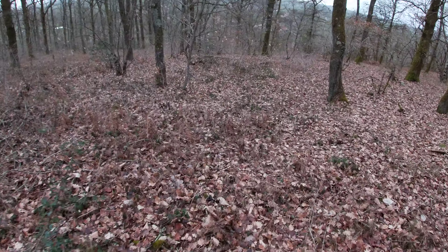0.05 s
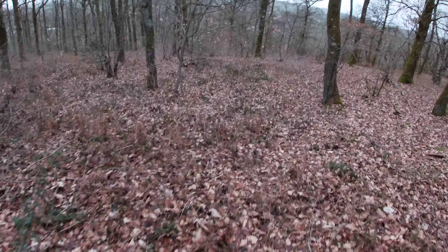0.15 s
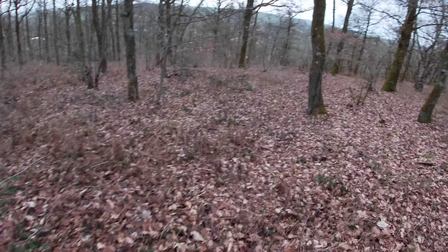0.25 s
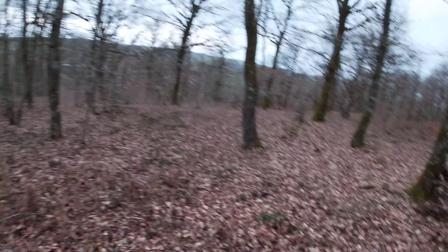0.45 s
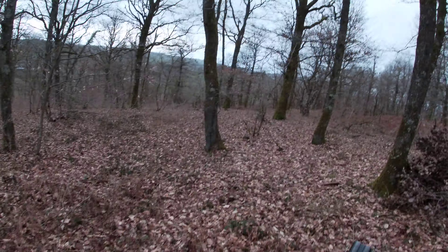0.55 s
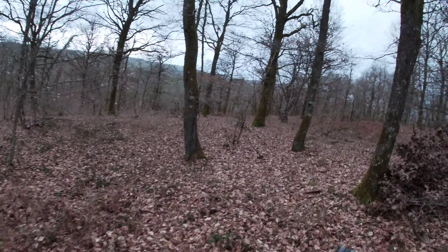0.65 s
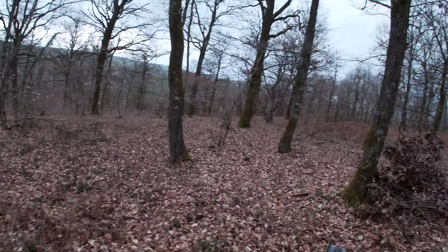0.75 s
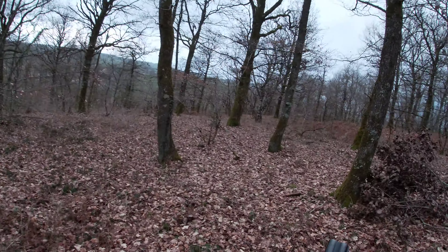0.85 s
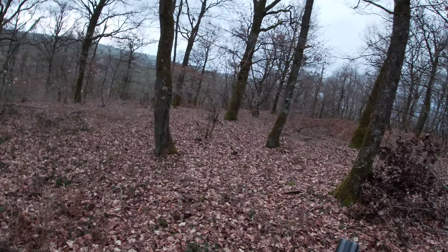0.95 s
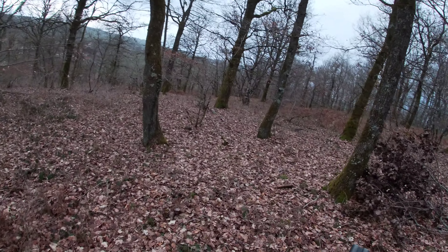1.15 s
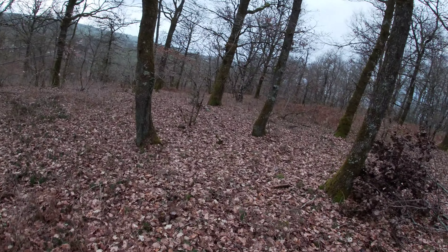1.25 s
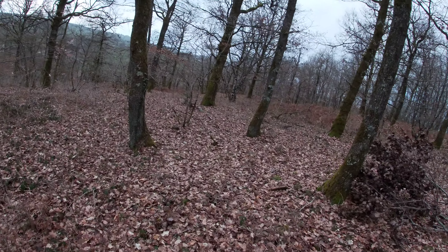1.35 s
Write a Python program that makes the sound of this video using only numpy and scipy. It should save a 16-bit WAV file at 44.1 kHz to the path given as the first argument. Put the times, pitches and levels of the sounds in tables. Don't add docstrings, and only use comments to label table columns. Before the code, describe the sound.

Dry fallen leaves rustle and crunch underfoot, with a sharp twig snap and low thump

```python
import sys
import numpy as np
from scipy import signal
from scipy.fft import rfft, irfft, next_fast_len
from scipy.io import wavfile
from scipy.ndimage import map_coordinates

SR = 44100
rng = np.random.default_rng(int(sys.argv[2]) if len(sys.argv) > 2 else 0)


def invert_db(level):
    return 10 ** (np.asarray(level, dtype=float) / 20)


def dump_mix(stems):
    frames = np.atleast_2d(stems).T
    limited = np.clip(frames, -1, 1)
    pcm = np.round(limited * 32767).astype(np.int16)
    wavfile.write(sys.argv[1], SR, pcm)


N = 61739
LEAF_FLOOR_DB = -54

# full strength at [s], rise [s per 20 dB], hold [s], fall [s per 20 dB], level [dB].
LEAF_STROKES = [
    (.004, 0.0116, 0.004, 0.2762, -52),
    (.175, 0.0423, 0.0105, 0.0612, -40),
    (.248, 0.043, 0.089, 0.21, -37.5),
    (.395, 0.1157, 0.05634, 0.0535, -30.5),
    (.70, 0.081, 0.0087, 0.58, -49.5),
    (.87, 0.0242, 0.043, 0.1786, -39),
    (.96, 0.054, .02, .09, -47),
    (1.17, 0.072, 0.0247, 0.0043, -51.5),
    (1.248, 0.0316, .008, .04, -44),
]
# frequency [Hz], level [dB per Hz].
DULL_COLOUR = [(59, -69.5), (100, -33.5), (139, -10.5), (360, -6), (712, -8), (839, -9.5), (1660, -14.5),
               (2600, -23.5), (3380, -34), (5720, -120)]


def unit(x):
    return x / np.sqrt(np.mean(x ** 2) + 1e-20)


def curve(strokes, floor_db):
    t = np.arange(N) / SR
    quiets_s, quiets_db = 1.298, -3.5
    sink = np.clip((t - quiets_s) / (N / SR - quiets_s), 0, 1)
    power = invert_db(2 * (floor_db + quiets_db * sink))
    for start_s, rise_s, hold_s, fall_s, db in strokes:
        rise_db = 20 * np.maximum(start_s - t, 0) / rise_s
        fall_db = 20 * np.maximum(t - start_s - hold_s, 0) / fall_s
        power = power + invert_db(2 * (db - rise_db - fall_db))
    return np.sqrt(power)


def wobble(rate_hz):
    return map_coordinates(rng.standard_normal(2000), [np.arange(N) * rate_hz / SR])


def colour(x, points):
    m = 2 * next_fast_len(N // 2 + 4096)
    f, db = np.transpose(points)
    hz = np.fft.rfftfreq(m, 1 / SR)
    gain = invert_db(np.interp(np.log(hz + 1), np.log(f + 1), db, left=db[0] - 31.5, right=-120)) + 1e-6
    cepstrum = irfft(np.log(unit(gain)), m)
    cepstrum[1:m // 2] *= 2
    cepstrum[m // 2 + 1:] = 0
    return irfft(rfft(x, m) * np.exp(rfft(cepstrum)), m)[:N]


def highpass(x, hz):
    return signal.filtfilt(*signal.butter(2, hz, "high", fs=SR), x)


def grains(rate_hz, scatter_db, bed_db, life_s):
    hits = rng.random(N) < rate_hz / SR
    size = invert_db(scatter_db * np.minimum(rng.exponential(size=N), 4))
    envelope = signal.lfilter([1], [1, -np.exp(-1 / (life_s * SR))], hits * size)
    hiss = invert_db(bed_db) * rng.standard_normal(N)
    return unit(unit(envelope * rng.standard_normal(N)) + hiss)


def ring(start_s, db, hz, t60_s, rise_s):
    t = np.maximum(np.arange(N) / SR - start_s, 0)
    return invert_db(db - 60 * t / t60_s) * (1 - np.exp(-t / rise_s)) ** 2 * np.sin(2 * np.pi * hz * t)


def burst(rows, t60_s, rise_s):
    envelope = 0
    for row in rows:
        t = np.maximum(np.arange(N) / SR - row[0], 0)
        envelope = envelope + invert_db(row[1] - 60 * t / t60_s) * (1 - np.exp(-t / rise_s))
    return rng.standard_normal(N) * envelope


def sway():
    # full strength at [s], rise [s per 20 dB], hold [s], fall [s per 20 dB], level [dB].
    sway_strokes = [
        (.125, 0.049, 0.0224, 0.062, -59),
        (.28, 0.09, 0.0404, 0.038, -37),
        (.395, 0.041, 0.04, 0.215, -38),
        (.54, 0.055, 0.061, 0.034, -56),
        (.79, .1, 0.077, 0.116, -57),
        (.94, .06, 0.026, 0.089, -57),
        (1.03, 0.033, 0.0575, 0.036, -48),
        (1.38, .04, 0.0196, .05, -62.5),
    ]
    # frequency [Hz], level [dB per Hz].
    rumble_colour = [(12, -5.5), (30, -6.5), (55, -1.5), (90, -21.5), (140, -21.5)]
    return curve(sway_strokes, -66) * unit(colour(rng.standard_normal(N), rumble_colour))


def footfall():
    start_s, held_s, stop_s = .2595, .07, .012
    late_s = np.maximum(np.arange(N) / SR - start_s - held_s, 0)
    return ring(start_s, db=-18, hz=69.83, t60_s=0.301, rise_s=0.00814) * np.exp(-late_s / stop_s)


def buckle():
    # start [s], level [dB], body mode [Hz].
    knock_rows = [(.238, -22.5, 342.6), (0.2424, -15, 153.9), (.5752, -22.5, 400), (0.591, -29, 179),
                  (0.74, -16.5, 339), (.7531, -2, 380.6), (0.9894, -21, 483), (1.155, -28, 480),
                  (1.192, -26, 480), (1.2015, -26, 620), (1.2145, -22, 560), (1.3461, -26.5, 338.6)]
    # ratio to the body mode, level [dB], share of its life.
    tick_modes = [(1.9, -19, .8), (3.2, -16, 0.67), (4.6, -30, 0.415), (9.5, -29.5, 0.37)]
    life_cycles, rise_cycles, lag_cycles = 3.804, 0.2636, 0.4504
    x = np.zeros(N)
    for start_s, db, hz in knock_rows:
        x += ring(start_s + lag_cycles / hz, db, hz, life_cycles / hz, rise_cycles / hz)
        for ratio, mode_db, share in tick_modes:
            x += ring(start_s, db + mode_db, hz * ratio, share * life_cycles / hz, 0.0447 / hz)
    scrape = invert_db(-29.5) * colour(burst(knock_rows, t60_s=0.0354, rise_s=0.00055), DULL_COLOUR)
    return highpass(x + scrape, 124.2)


def cloth():
    # full strength at [s], rise [s per 20 dB], hold [s], fall [s per 20 dB], level [dB].
    rub_strokes = [(0, 0.022, 0.00265, 0.0138, -50), (.13, 0.232, 0.0537, 0.08, -49.5),
                   (.25, 0.064, 0.0457, 0.117, -45.5), (.38, 0.064, 0.0205, 0.161, -36.5),
                   (.43, 0.051, 0.012, 0.033, -42), (.58, .05, 0.0235, 0.07, -47),
                   (.69, 0.0784, 0.035, 0.071, -45), (.745, 0.062, 0.0313, 0.116, -44.5),
                   (.88, 0.0736, 0.0364, 0.143, -43), (.98, 0.057, 0.0142, 0.0375, -46.5),
                   (1.15, 0.172, 0.0275, 0.055, -48), (1.195, .04, .025, .05, -45)]
    # start [s], length [s], level [dB], pitch [Hz].
    squeak_rows = [
        (0, 0.0243, -51, 3890),
        (0.448, 0.0109, -36.5, 1181),
        (0.465, 0.121, -52.5, 1612),
        (0.596, 0.059, -47.5, 1656),
        (0.641, 0.094, -53, 1696),
    ]
    slips = grains(rate_hz=900, scatter_db=2.5, bed_db=0.5, life_s=0.000788)
    x = colour(curve(rub_strokes, -55) * invert_db(0.887 * wobble(60.11)) * slips, DULL_COLOUR)
    t = np.arange(N) / SR
    for start_s, length_s, db, hz in squeak_rows:
        swell = np.sin(np.pi * np.clip((t - start_s) / length_s, 0, 1))
        tone = np.sin(2 * np.pi * hz * t + 1.22 * wobble(160))
        x = x + invert_db(db + 2.0 * wobble(120.6)) * swell * tone
    return x


def twig():
    # frequency [Hz], level [dB], t60 [s].
    twig_modes = [(817, -18.5, .012), (1151, -14.5, 0.01126), (2057, -16.5, 0.0078), (3026, -6.5, 0.00657),
                  (3503, -5.5, 0.00694), (5299, 0, 0.00581), (7254, -7.5, 0.00535), (10280, -31, 0.00616)]
    # delay after the break [s], level [dB].
    splinter_rows = [
        (.0016, -12.5),
        (.0029, -14),
        (.0054, -18.5),
    ]
    snap_s, snap_db, rise_s = .2671, -3, 0.000203
    breaks = [(0, 0.0015)] + splinter_rows
    vary = rng.standard_normal((len(breaks), len(twig_modes), 2))
    vary[0] = 0
    x = np.zeros(N)
    for i, (delay_s, break_db) in enumerate(breaks):
        for k, (hz, db, t60_s) in enumerate(twig_modes):
            mode_db = snap_db + break_db + db + 4.25 * vary[i, k, 0]
            x += ring(snap_s + delay_s, mode_db, hz * (1 + 0.069 * vary[i, k, 1]), t60_s, rise_s)
    return x


def leaves():
    # frequency [Hz], level [dB per Hz].
    crisp_colour = [(710, -31), (1200, -13), (2130, -13), (3450, -5.5), (4570, -8), (5550, -5), (6960, -7),
                    (11400, -33), (15800, -41.5)]
    # start [s], peak level [dB], top-band level relative to it [dB].
    crackle_rows = [(0.0771, -34.5, -6.5), (0.2304, -26.5, 3), (0.2327, -25.5, 2), (0.2482, -20, 0.5),
                    (0.3468, -18.5, 5), (0.4605, -38.5, 6.5), (0.5607, -33.5, 4), (0.6714, -42.5, 12),
                    (0.7063, -34, 7), (0.883, -25, -7.5), (.909, -26, -3.5), (0.929, -27.5, -8.5),
                    (0.9671, -30, 0.5), (0.9892, -30.5, -3), (1.0096, -37, -3.5), (1.0177, -38.5, -2.5),
                    (1.1004, -37, -8), (1.3175, -39, -10)]
    # full strength at [s], rise [s per 20 dB], hold [s], fall [s per 20 dB], level [dB].
    hiss_strokes = [
        (.18, 0.041, 0.0156, 0.041, -39.5),
        (.48, .05, 0.041, 0.116, -51),
        (.675, 0.0204, 0.071, .05, -44.5),
    ]
    crackle_t60_s, crackle_rise_s = 0.00864, 0.00071
    strength = curve(LEAF_STROKES, LEAF_FLOOR_DB)
    flutter = invert_db(1.124 * wobble(34.6) + 1.394 * wobble(140))
    rustle = strength * flutter * grains(rate_hz=3000, scatter_db=1.5, bed_db=1.5, life_s=0.000367)
    crackles = invert_db(1) * burst(crackle_rows, crackle_t60_s, crackle_rise_s)
    spark_rows = [(start_s, db + top_db) for start_s, db, top_db in crackle_rows]
    sparks = invert_db(3.5) * burst(spark_rows, crackle_t60_s, crackle_rise_s)
    hisses = curve(hiss_strokes, -90.5) * rng.standard_normal(N)
    bright_gain = (strength / invert_db(-38)) ** 0.254
    top = highpass((bright_gain - 1) * rustle + sparks + hisses - crackles, 8070)
    return colour(rustle + crackles + top, crisp_colour)


def scene():
    # frequency [Hz], level [dB].
    fizz_colour = [(9500, -23.5), (11500, -11), (13000, 0), (15900, -8)]
    x = sway() + footfall() + buckle() + cloth() + twig() + leaves()
    fizz = colour(rng.standard_normal(N), fizz_colour)
    side = invert_db(-33.5) * curve(LEAF_STROKES, LEAF_FLOOR_DB - 3.5) * fizz
    return np.array([x + side, x - side])


def band_limit(x):
    return signal.sosfilt(signal.butter(12, 15950, fs=SR, output="sos"), x)


def record(dry):
    return band_limit(dry)


dry = scene()
out = record(dry)
dump_mix(out)
```